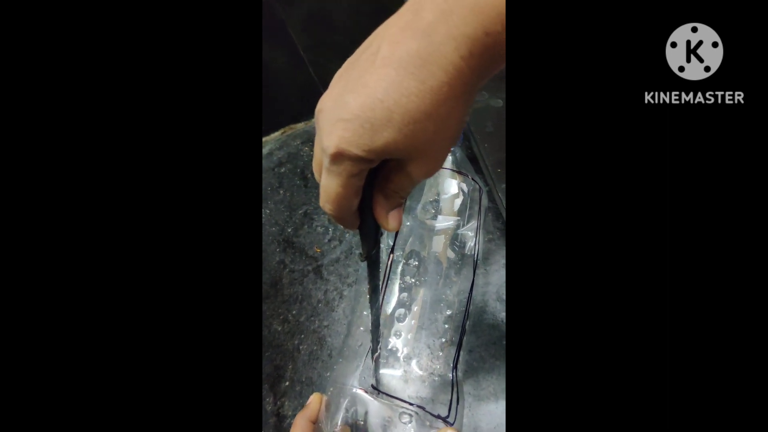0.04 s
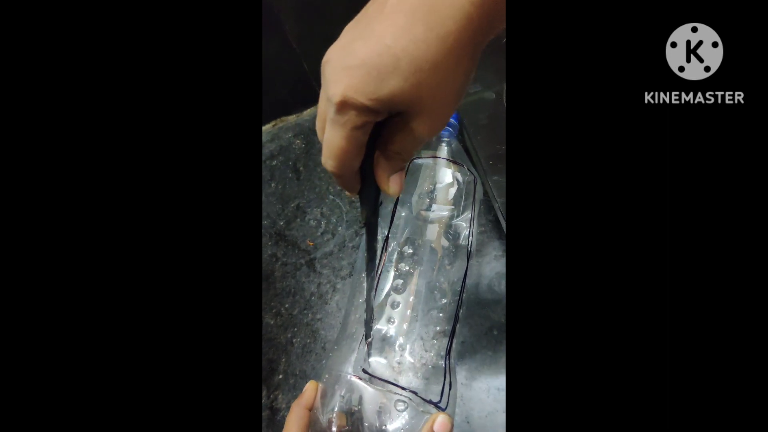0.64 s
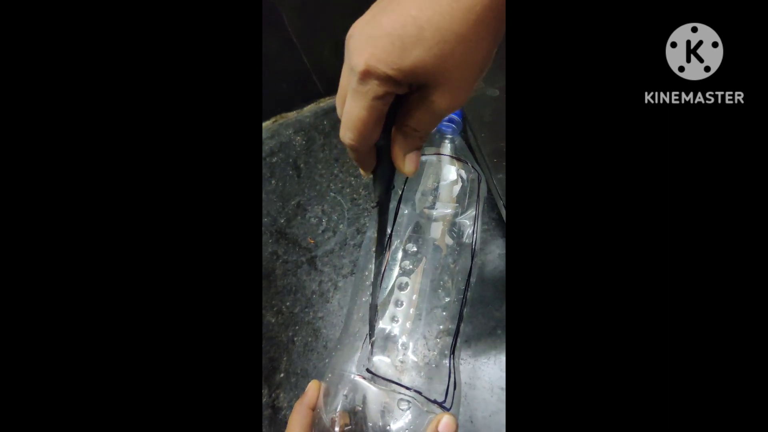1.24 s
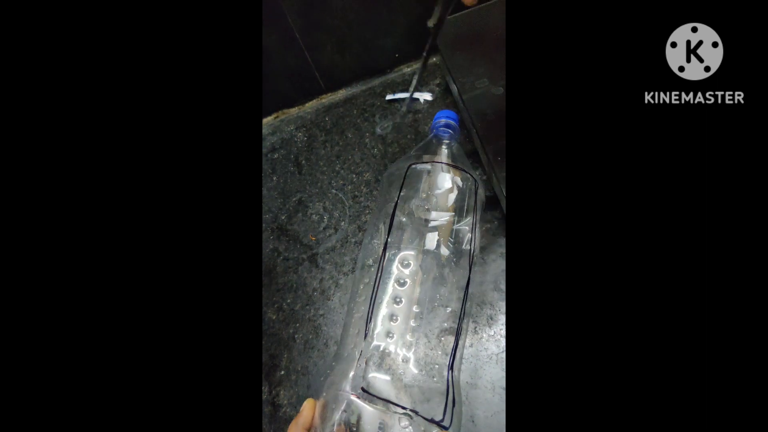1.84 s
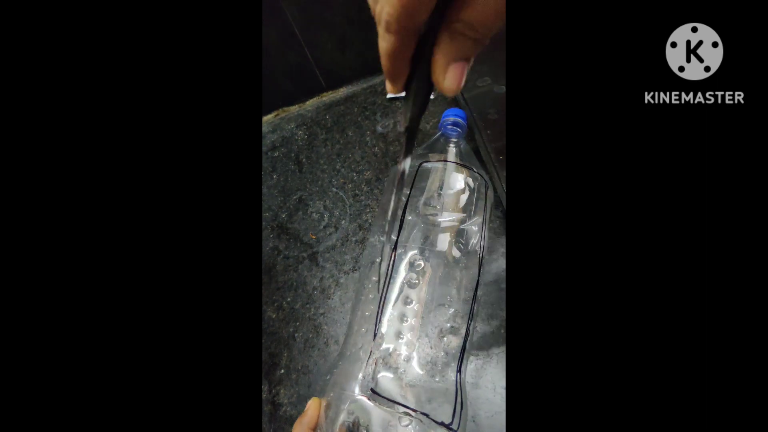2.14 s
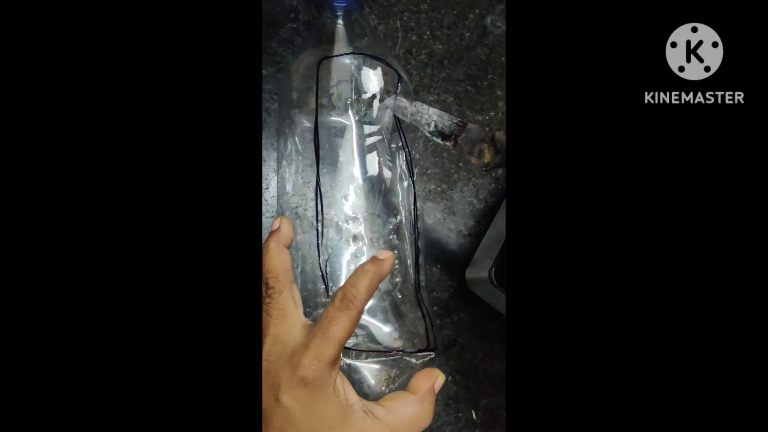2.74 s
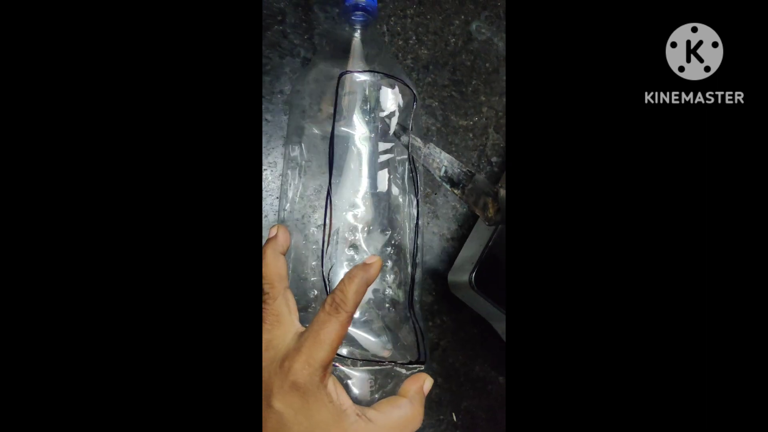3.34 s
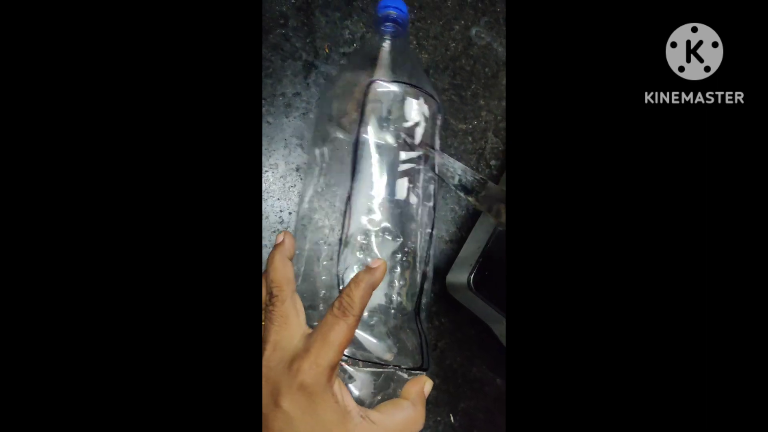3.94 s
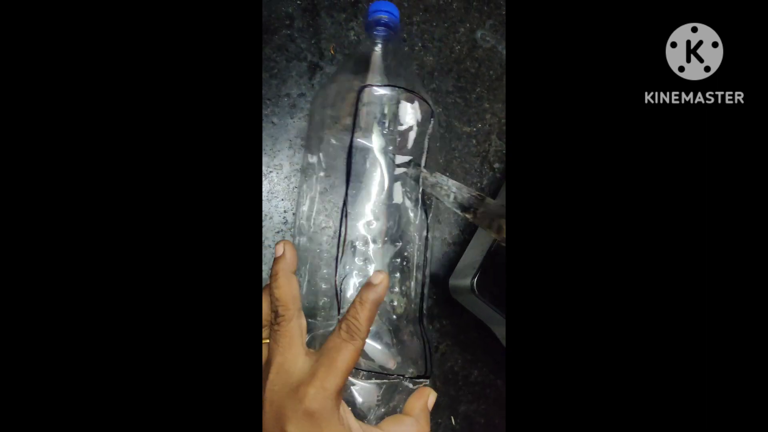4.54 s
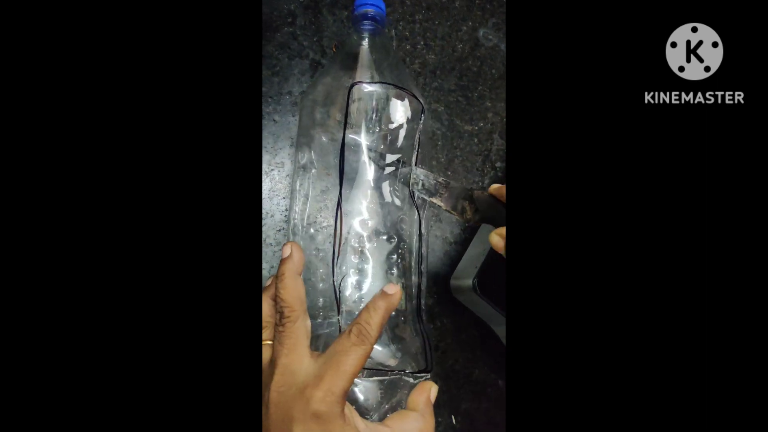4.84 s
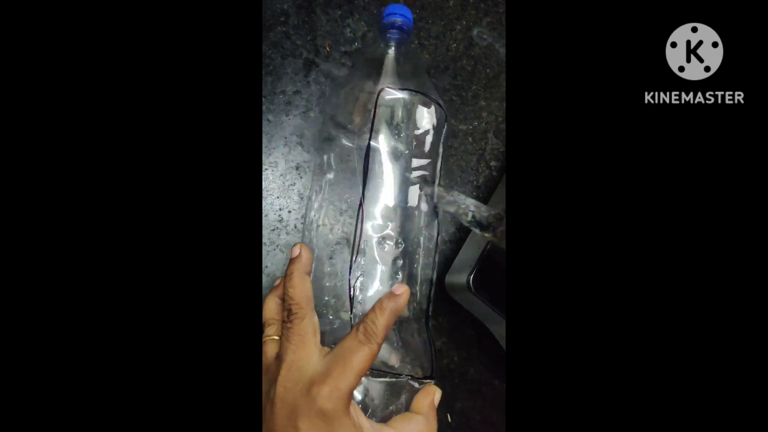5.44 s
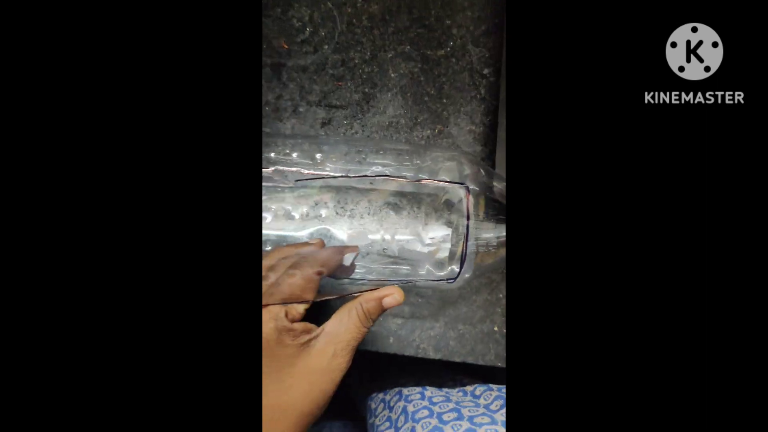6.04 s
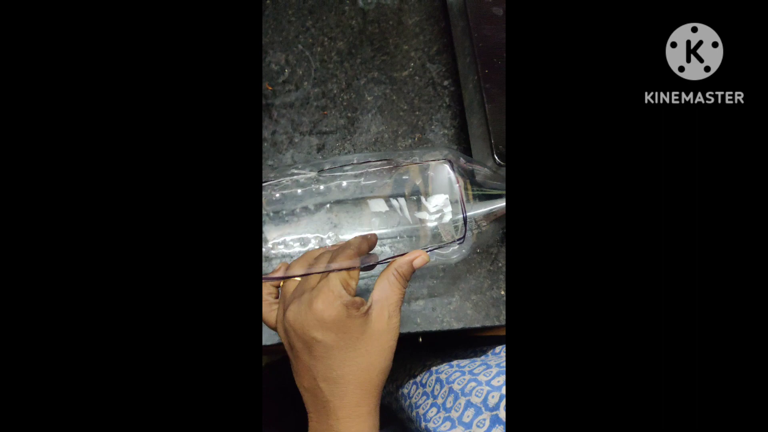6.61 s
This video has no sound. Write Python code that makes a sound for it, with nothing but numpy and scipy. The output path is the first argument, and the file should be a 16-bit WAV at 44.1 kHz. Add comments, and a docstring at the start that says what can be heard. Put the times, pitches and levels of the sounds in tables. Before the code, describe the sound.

Close to the microphone, an empty plastic bottle crackles as a hot blade sticks and slips through its side. Scattered soft crunches build into sharp clacks and hollow pops with a short indoor echo, while the melting plastic hisses faintly. A last crack comes with a dull bump on the counter and stops suddenly, leaving only quiet rubbing, sizzling and light ticks over a low room rumble.

```python
"""Hot blade cutting a plastic bottle

A heated blade is worked along an empty bottle on a stone counter in a small hard room. It sticks and
slips: each slip buckles the thin wall, which booms, clacks and cracks, and finer crinkles follow.
In between, the hot edge hisses on the plastic. The sound of the hard cutting breaks off abruptly,
ringing and echoes included, and gentle strokes follow. A close stereo microphone rounds the peaks."""
import sys
import numpy as np
from scipy import signal
from scipy.fft import rfft, irfft, next_fast_len
from scipy.io import wavfile
from scipy.ndimage import uniform_filter1d

SR = 44100
rng = np.random.default_rng(int(sys.argv[2]) if len(sys.argv) > 2 else 0)


def unload_audio(sound):
    """Save the sound as a 16-bit wav file, at the path given as the first command line argument."""
    columns = np.transpose(np.atleast_2d(sound))
    # keep every value between -1 and 1, then stretch to whole-number steps
    steps = np.round(np.clip(columns, -1, 1) * 32767)
    wavfile.write(sys.argv[1], SR, steps.astype(np.int16))


N = 294147
TIME = np.arange(N) / SR
BREAK_S = 5.304   # the sound of the hard cutting breaks off here, ringing and echoes included


def from_db(db):
    """Decibels to gain."""
    return 10 ** (np.asarray(db) / 20)


def rms(x):
    """Root mean square."""
    return np.sqrt(np.mean(x ** 2) + 1e-20)


def unit_attack(sound):
    """Scale a blow to rms 1 over its first 11 ms."""
    return sound / rms(sound[..., :int(.011 * SR)])


def add(out, start_s, sound):
    """Mix a sound in from start_s."""
    start = int(start_s * SR)
    out[:, start:start + sound.shape[-1]] += sound[..., :N - start]


def at_hz(curve, hz):
    """Read a (Hz, value) curve on a log-frequency axis."""
    curve_hz, values = np.transpose(curve)
    return np.interp(np.log(np.maximum(hz, 1)), np.log(curve_hz), values)


def bins_hz(size):
    """Frequencies of a real FFT."""
    return np.fft.rfftfreq(size, 1 / SR)


def colour(x, curve):
    """Minimum-phase filter along a (Hz, dB) curve."""
    size = next_fast_len(x.shape[-1] + 2048, real=True)
    cepstrum = irfft(np.log(from_db(at_hz(curve, bins_hz(size)))), size)
    causal_fold = 1 + np.sign(size / 2 - np.arange(size)) * (np.arange(size) > 0)
    response = np.exp(rfft(cepstrum * causal_fold))
    return irfft(rfft(x, size) * response, size)[..., :x.shape[-1]]


def band(x, low_hz, high_hz, order=2):
    """Butterworth band-pass."""
    return signal.sosfilt(signal.butter(order, [low_hz, high_hz], "band", fs=SR, output="sos"), x)


# Diffuse sound at the microphone. Each row: frequency in Hz, left-right correlation.
COHERENCE = [(60, .9), (150, .97), (300, .92), (640, .35), (1400, .1), (3000, 0)]

def diffuse_noise(size):
    """White stereo noise, alike on both sides in the bass, unrelated in the treble."""
    padded = next_fast_len(size, real=True)
    mid, side = rfft(rng.standard_normal((2, padded)))
    alike = at_hz(COHERENCE, bins_hz(padded))
    spectrum = np.sqrt(1 + alike) * mid + np.sqrt(1 - alike) * side * [[1], [-1]]
    return irfft(spectrum, padded)[:, :size]


def grainy_noise(curve, grain_db, grain_samples=90):
    """Coloured noise of rms 1 that swells and sinks in tiny grains."""
    grains = uniform_filter1d(rng.standard_normal(N), grain_samples)
    noise = colour(diffuse_noise(N) * from_db(grain_db * grains / rms(grains)), curve)
    return noise / rms(noise)


# Room noise spectrum. Each row: frequency in Hz, relative level in dB.
ROOM_NOISE = [(25, -9.5), (45, -27), (75, -9), (110, -14.5), (150, -5), (240, -21.5), (390, -19),
              (700, -28.5), (1100, -30.5), (2000, -38.5), (4000, -47), (8000, -52)]
# Steady whine in the room. Each row: centre in Hz, width in Hz, level in dB.
WHINE_BANDS = [(7060, 250, -77), (8100, 230, -77)]

def background(room_db=-48, hiss_db=-74):
    """Low room noise, microphone hiss and a thin whine."""
    out = from_db(room_db) * grainy_noise(ROOM_NOISE, grain_db=1)
    out += from_db(hiss_db) * rng.standard_normal((2, N))
    for hz, width_hz, db in WHINE_BANDS:
        whine = band(rng.standard_normal((2, N)), hz - width_hz / 2, hz + width_hz / 2)
        out += from_db(db) * whine / rms(whine)
    return out


# Room decay. Each row: frequency in Hz, T60 in seconds.
ROOM_DECAY = [(150, 0.45), (500, 0.37), (2000, 0.3), (6000, 0.29), (14000, 0.3)]

def room(x, bass_db=-13, mid_db=-9, treble_db=-9, build_s=0.0035):
    """Add diffuse echoes that build quickly between hard walls and die octave by octave."""
    t = np.arange(SR * 2 // 3) / SR
    spectrum, hz = rfft(diffuse_noise(len(t))), bins_hz(len(t))
    build_up = 1 - np.exp(-(t / build_s) ** 2)
    edges_hz = np.geomspace(70, 17920, 9)
    response = 0
    for low, high in zip(edges_hz, edges_hz[1:]):
        envelope = build_up * from_db(-60 * t / at_hz(ROOM_DECAY, np.sqrt(low * high)))
        octave = irfft(spectrum * (hz >= low) * (hz < high), len(t))
        response += octave * envelope / np.linalg.norm(envelope)
    response = colour(response, [(250, bass_db), (1200, mid_db), (7000, treble_db)])
    return x + signal.fftconvolve(x, response, axes=1)[:, :N]


# Shoves of the bottle against the counter. Each row: start in seconds, relative level in dB.
SHOVES = [(2.776, -49), (3.713, -42), (4.278, -20.5), (5.255, -15.5), (5.29, -23)]

def counter_thuds(gain_db=-3, pitch_hz=75, t60_s=0.048):
    """The heavy counter answers each shove with a few dull cycles."""
    t, out = np.arange(SR // 6) / SR, np.zeros((2, N))
    thud = from_db(gain_db - 60 * t / t60_s) * np.sin(2 * np.pi * pitch_hz * t)
    for start_s, db in SHOVES:
        add(out, start_s, from_db(db) * thud)
    return out


# Knocks of the knife on the counter. Each row: start in seconds, relative level in dB.
KNIFE_KNOCKS = [(2.776, -20), (5.291, -12)]
# Blade modes. Each row: frequency in Hz, relative level in dB, T60 in seconds.
BLADE_MODES = [(810, -2, 0.14), (910, 1, 0.15), (970, -10, 0.16)]

def blade_ring(gain_db=-5):
    """Each knock leaves the steel blade ringing briefly."""
    t, out = np.arange(SR // 3) / SR, np.zeros((2, N))
    for start_s, knock_db in KNIFE_KNOCKS:
        for hz, mode_db, t60_s in BLADE_MODES:
            envelope = from_db(gain_db + knock_db + mode_db - 60 * t / t60_s)
            add(out, start_s, envelope * np.sin(2 * np.pi * hz * t))
    return out


def stroke_envelope(start_s, end_s, attack_s=0.04, release_t60_s=0.44):
    """A stroke rises, holds and dies away; the sound of one begun before the break ends there."""
    rise = np.clip((TIME - start_s) / attack_s, 0, 1)
    release = from_db(-60 * np.clip((TIME - end_s) / release_t60_s, 0, 2))
    return rise * release * ((TIME < BREAK_S) | (start_s > BREAK_S))


# Sizzle and rub spectra. Each row: frequency in Hz, relative level in dB.
SIZZLE_SPECTRUM = [(2000, -9), (3500, 2), (4700, 0.5), (6300, 3), (7400, 8), (8300, 2.5), (11000, -6.5),
                   (13000, -16.5), (15500, -17)]
RUB_SPECTRUM = [(300, 6), (500, 5.5), (700, -0.5), (1300, 0), (1800, -4), (2800, -4), (4500, -19),
                (7000, -32)]
# Strokes of the hot edge. Each row: start and end in seconds, relative sizzle and rub levels in dB.
EDGE_STROKES = [(0.077, 0.245, -58.5, -48.5), (0.315, 0.463, -64, -52), (0.864, 1.012, -60, -46.5),
                (1.115, 1.259, -59, -54), (1.246, 1.564, -49.5, -39), (1.647, 1.78, -60, -51.5),
                (2.36, 2.629, -50.5, -49), (2.68, 2.801, -54.5, -49), (2.871, 3.096, -46, -40.5),
                (3.2, 3.504, -46, -40.5), (3.55, 3.892, -47.5, -41), (3.96, 4.127, -49, -54),
                (4.182, 4.367, -41, -38.5), (4.427, 4.646, -42, -62), (4.663, 5.08, -54, -42.5),
                (5.231, 5.297, -39, -27.5), (5.427, 5.537, -64.5, -54.5), (5.534, 5.656, -58, -50),
                (5.858, 5.963, -50.5, -46), (5.949, 5.995, -46.5, -41.5), (6.148, 6.26, -57.5, -53),
                (6.26, 6.327, -44.5, -44), (6.358, 6.486, -48.5, -43), (6.504, 6.557, -42.5, -39),
                (6.586, 6.67, -50.5, -45)]

def hot_edge(sizzle_gain_db=-1, rest_sizzle_db=-77.5, rest_rub_db=-65.5, waver_db=1.6, wavers_per_s=30):
    """Melting plastic sizzles on the steel; the flat of the blade rubs in the slit. The hand wavers."""
    melting, rubbing = from_db(rest_sizzle_db), from_db(rest_rub_db)
    waver = np.interp(TIME * wavers_per_s, np.arange(SR), rng.standard_normal(SR))
    for start_s, end_s, sizzle_db, rub_db in EDGE_STROKES:
        envelope = stroke_envelope(start_s, end_s)
        melting = np.maximum(melting, from_db(sizzle_db + sizzle_gain_db) * envelope)
        rubbing = np.maximum(rubbing, from_db(rub_db) * envelope)
    sizzle = melting * grainy_noise(SIZZLE_SPECTRUM, grain_db=1)
    rub = rubbing * grainy_noise(RUB_SPECTRUM, grain_db=1.5)
    return from_db(waver_db * waver) * (sizzle + rub)


# Flexing modes of the bottle wall. Each row: frequency in Hz, relative level in dB, T60 in seconds.
WALL_MODES = [(142, -19, 0.092), (199, 0, 0.16), (265.3, -3, 0.13), (290, -2, 0.098), (330, 2.5, 0.067),
              (382.6, 0, 0.095), (424, -7.5, 0.11), (470.5, 3.5, 0.067), (498, -4.5, 0.11),
              (563.3, 1, 0.12)]

def boom(t, panel_hz, rise_s, spread_octaves=0.48, scatter_db=2, lobe_hz=900):
    """A buckling panel rings the wall modes near its own pitch."""
    hz, db, t60_s = np.transpose(WALL_MODES)[:, :, None]
    nearness = 1 / (1 + (np.log2(hz / panel_hz) / spread_octaves) ** 2) ** 2
    strength = nearness * from_db(db + scatter_db * rng.standard_normal(hz.shape))
    # higher modes radiate in lobes and reach left and right out of step
    lobe_phase = rng.standard_normal(hz.shape) * (hz / lobe_hz) ** 2
    phase = 2 * np.pi * hz * t + np.array([lobe_phase, -lobe_phase])
    modes = -strength * from_db(-60 * t / t60_s) * np.sin(phase)
    ring = modes.sum(axis=1) * (1 - np.exp(-t / rise_s))
    return unit_attack(band(ring, 133, 2100))   # the boom carries little deep bass


def crinkles(size, creases_per_s=130, strength_db=3, fade_s=0.0021):
    """Gain on the scattered waves: tiny creases give way at random and each swells them briefly."""
    creases = (rng.random(size) < creases_per_s / SR) * rng.exponential(1, size)
    swells = signal.lfilter([1], [1, -np.exp(-1 / (fade_s * SR))], creases + 1e-18)
    return 1 + from_db(strength_db) * swells


def snap(t, waves, low_hz, high_hz, t60_s, pulse):
    """One sharp pulse, then bending waves that scatter through the sheet and die."""
    burst = waves * from_db(-60 * t / t60_s) - pulse * (t == 0)
    return unit_attack(band(burst, low_hz, high_hz, order=3))


# Shoulder and base resonances. Each row: frequency in Hz, width in Hz, gain in dB.
SHELL_RESONANCES = [(701.6, 6.6, 19.5), (755.5, 9.8, 7), (760, 22, 2), (800, 8.5, 4), (920, 23, -0.5),
                    (996, 11, 7), (1110, 78, 0.5), (1295, 220, 1), (1300, 25, 3), (1383, 63, 2.5),
                    (1690, 26, 5.5), (2130, 220, 4), (2410, 100, -2), (2510, 35, 1), (3010, 19, 6.5),
                    (3160, 65, 2.5), (3620, 72, 2.5)]

def shell(x):
    """The stiff parts of the bottle ring on at their own pitches."""
    out = x.copy()
    for hz, width_hz, db in SHELL_RESONANCES:
        resonator = signal.iirpeak(hz, hz / width_hz, fs=SR)
        out += (from_db(db) - 1) * signal.lfilter(*resonator, x)
    return out


# Colour of a snap in the thin sheet. Each row: frequency in Hz, gain in dB.
SHEET_COLOUR = [(300, 4.5), (620, -6), (1000, -3.5), (1400, -5), (1800, -2), (2400, 4.5), (3500, -0.5),
                (5000, 2), (7300, 9), (9000, -2), (12000, 0.5), (16000, -15)]

def bottle(slips, boom_gain_db=-3, crumple_gain_db=-6, clack_gain_db=-2.42, crack_gain_db=-1.5,
           tick_gain_db=-1):
    """Each slip sounds the wall and the sheet from a new spot, so with a new pattern of waves."""
    t = np.arange(SR // 8) / SR
    wall, sheet = np.zeros((2, 2, N))
    for start_s, panel_hz, boom_db, crack_db, bright_db in slips:
        clack_db = crack_db + 10 - bright_db
        tick_db = crack_db - 9.5 + bright_db
        crumple_db = (boom_db + clack_db) / 2
        tick_top_hz = np.interp(tick_db - crack_db, [-8, 7], [9000, 16000])
        rise_s = np.interp(boom_db - clack_db, [5, 22], [0.0005, 0.003])   # little clack: a slow buckle
        waves = diffuse_noise(len(t)) * crinkles(len(t))
        crumple = snap(t, waves, 385, 616, t60_s=0.04, pulse=2.3)   # too many modes to have a pitch
        clack = snap(t, waves, 790, 1440, t60_s=0.065, pulse=11.6)
        crack = snap(t, waves, 1770, 3770, t60_s=0.046, pulse=4.5)
        tick = snap(t, waves, 4460, tick_top_hz, t60_s=0.068, pulse=1.9)
        add(wall, start_s, from_db(boom_db + boom_gain_db) * boom(t, panel_hz, rise_s))
        add(wall, start_s, from_db(crumple_db + crumple_gain_db) * crumple)
        add(sheet, start_s, from_db(clack_db + clack_gain_db) * clack)
        add(sheet, start_s, from_db(crack_db + crack_gain_db) * crack)
        add(sheet, start_s, from_db(tick_db + tick_gain_db) * tick)
    return wall + shell(colour(sheet, SHEET_COLOUR))


# Firm pushes on the blade. Each row: start and end in seconds, panel pitch in Hz,
# relative boom and crack levels in dB, brightness in dB.
PUSHES = [(0.339, 0.512, 200, -34, -56.5, -2.5), (0.94, 1.058, 231, -30, -52, -2),
          (1.267, 1.386, 293, -19, -43, -4), (1.466, 1.52, 384, -19.5, -42.5, -0.5),
          (2.369, 2.505, 298, -18.5, -32.5, -2), (3.359, 3.455, 388.8, -10.5, -32.5, 1.5),
          (4.028, 4.088, 305, -7.5, -40, 0), (4.446, 4.635, 365.6, -14.5, -27, -1),
          (4.799, 4.931, 305, -16.5, -40, -1), (4.961, 5.1, 310, -12.5, -38, 0)]

def crunch_slips(slips_per_s=72, jitter=.35, swell_db=4, pitch_scatter_octaves=.07,
                 boom_scatter_db=1.4, crack_scatter_db=2.5, bright_scatter_db=2):
    """Rows of lesser slips: under a push the blade sticks and slips unevenly, hardest in the middle."""
    slips = []
    for start_s, end_s, panel_hz, boom_db, crack_db, bright_db in PUSHES:
        count = round((end_s - start_s) * slips_per_s)
        places = (np.arange(count) + .5 + jitter * rng.uniform(-1, 1, count)) / count
        for place in places:
            pitch, depth, force, bright = rng.standard_normal(4)
            arch_db = swell_db * (np.sin(np.pi * place) - 1)
            slips.append((start_s + place * (end_s - start_s),
                          panel_hz * 2 ** (pitch_scatter_octaves * pitch),
                          boom_db + arch_db + boom_scatter_db * depth,
                          crack_db + arch_db + crack_scatter_db * force,
                          bright_db + bright_scatter_db * bright))
    return slips


# Slips that stand out. Each row: start in seconds, panel pitch in Hz,
# relative boom and crack levels in dB, brightness in dB.
MAIN_SLIPS = [(0.416, 187, -26.5, -66, -6), (0.444, 213, -22.5, -43.5, -3), (0.483, 368, -23, -46.5, -8),
              (0.862, 229, -26, -50.5, -1), (0.899, 217, -22.5, -45.5, -4), (0.931, 419.3, -18, -42, -1),
              (0.985, 332, -16, -37.5, -7), (1.245, 326, -18.5, -40.5, 0), (1.31, 274, -16, -35.5, 1.5),
              (1.405, 300, -21, -37.5, 6), (1.421, 270, -11, -29.5, 2.5), (1.431, 273, -12, -29, -2.5),
              (1.452, 360, -6, -24.5, -4.5), (1.463, 447, -12.5, -34, 5), (1.552, 325, -25, -57, 4),
              (1.674, 390, -31.5, -54.5, 4), (2.269, 354, -34, -52.5, -1), (2.363, 300, -17.5, -35.5, -3.5),
              (2.405, 330, -10.5, -33.5, -2), (2.434, 373, -10, -24.5, -2), (2.45, 343, -12, -37, -6.5),
              (2.467, 330, -10, -35, -0.5), (2.518, 323, -17, -44, -10.5), (2.599, 297, -17.5, -36.5, -2.5),
              (2.749, 280, -45, -43, -4), (2.769, 270, -22, -36, -1.5), (2.777, 253, -17, -29, 2.5),
              (2.958, 290, -21, -26.5, 12), (3.266, 320, -15, -28.5, 5.5), (3.274, 334, -14.5, -38, -4),
              (3.327, 330, -8, -27, -3.5), (3.352, 330, -15, -23, 0.5), (3.407, 355.6, -9, -23, -3.5),
              (3.439, 347, -14, -28.5, 3.5), (3.485, 430, -16, -32, -1.5), (3.715, 314, -10.5, -26.5, -4.5),
              (3.744, 290, -14, -28.5, -2), (3.964, 300.5, -22.5, -47, 6), (3.975, 290, -9.5, -39.5, 1),
              (4.02, 330, -8.5, -41.5, 0), (4.068, 305.5, -5, -39, -5), (4.281, 325, -19.5, -51, 1),
              (4.382, 325, -8, -21, -0.5), (4.438, 375.1, -15.5, -31.5, -7.5),
              (4.472, 386, -10.5, -24.5, 3), (4.542, 316.3, -16, -22.5, 2), (4.578, 264.1, -15, -22.5, 1.5),
              (4.747, 290, -16, -44, -6), (4.767, 354, -5.5, -30, -5.5), (4.787, 430, -23, -18.5, 1),
              (4.839, 300, -10, -41, 1), (4.856, 330, -11, -32.5, -3.5), (4.946, 303, -13.5, -33.5, -3.5),
              (5.026, 296, -2.5, -46, 6), (5.08, 288.3, -12, -42, 4), (5.258, 290.4, -10.5, -32, 1.5),
              (5.291, 330, -21, -22, -0.5), (5.3, 348, -7.5, -25.5, 8), (5.836, 383, -37, -64, 1),
              (6.361, 430, -43, -53, 14), (6.409, 410, -26.5, -53.5, -2.5), (6.47, 430, -50.5, -55.5, 20),
              (6.646, 390, -35, -66, 6)]

def gentle_cutting():
    """A few light slips buckle the wall after the break."""
    return bottle([slip for slip in MAIN_SLIPS if slip[0] >= BREAK_S])


def hard_cutting(stick_s=.011):
    """Main slips and crunches up to the break; no lesser slip starts while the blade sticks."""
    main = [slip for slip in MAIN_SLIPS if slip[0] < BREAK_S]
    lesser = [slip for slip in crunch_slips() if not any(0 < big[0] - slip[0] < stick_s for big in main)]
    return bottle(main + lesser)


def scene(right_lag_s=.00024):
    """The sound of hard cutting breaks off, gentle strokes follow; the bottle lies slightly left."""
    floor, edge = background(), hot_edge()
    gentle = room(gentle_cutting())
    hard = room(hard_cutting()) + counter_thuds() + blade_ring()
    until_break = np.clip((BREAK_S - TIME) / .001, 0, 1)
    left, right = hard * until_break + gentle + edge
    return np.array([left, np.roll(right, round(right_lag_s * SR))]) + floor


# Balance of the microphone ports. Each row: frequency in Hz, left minus right in dB.
PORT_BALANCE = [(200, 2.5), (380, -2.5), (700, 1.5), (2400, -2), (4400, -5), (6000, -13), (7600, -22),
                (10000, -14), (14000, -0.5)]

def record(dry, cutoff_hz=15800):
    """The left port is duller than the right; peaks are rounded and the top is cut."""
    hz, balance_db = np.transpose(PORT_BALANCE)
    right_db = -10 * np.log10((1 + from_db(balance_db) ** 2) / 2)   # keeps the mean power of the pair
    left = colour(dry[0], np.c_[hz, right_db + balance_db])
    right = colour(dry[1], np.c_[hz, right_db])
    lowpass = signal.ellip(10, .2, 80, cutoff_hz, fs=SR, output="sos")
    return signal.sosfilt(lowpass, np.tanh([left, right]))


dry = scene()
out = record(dry)
unload_audio(out)
```